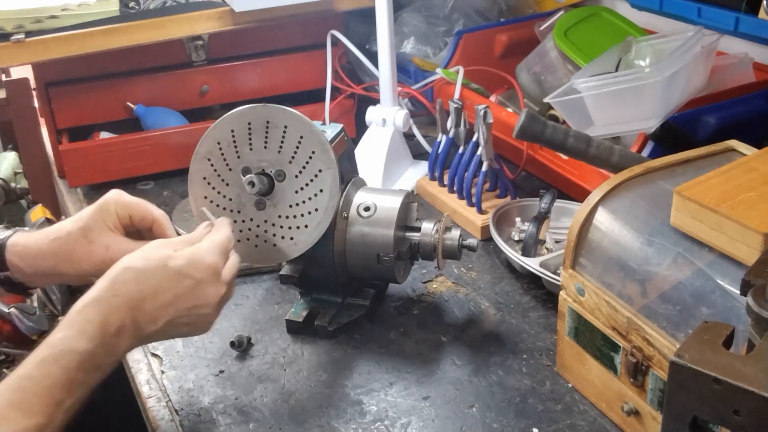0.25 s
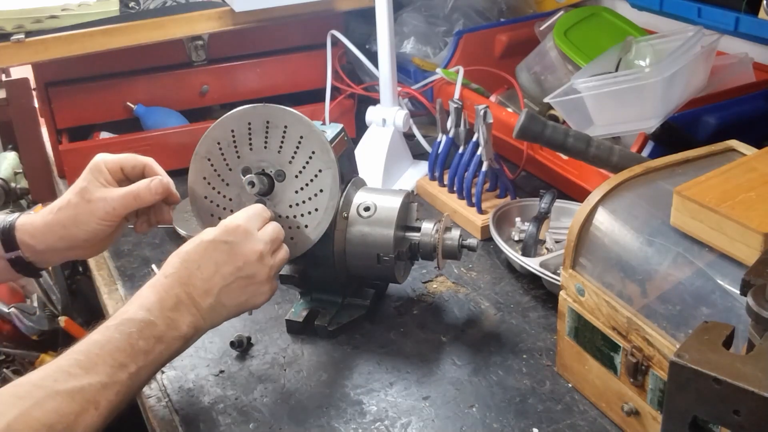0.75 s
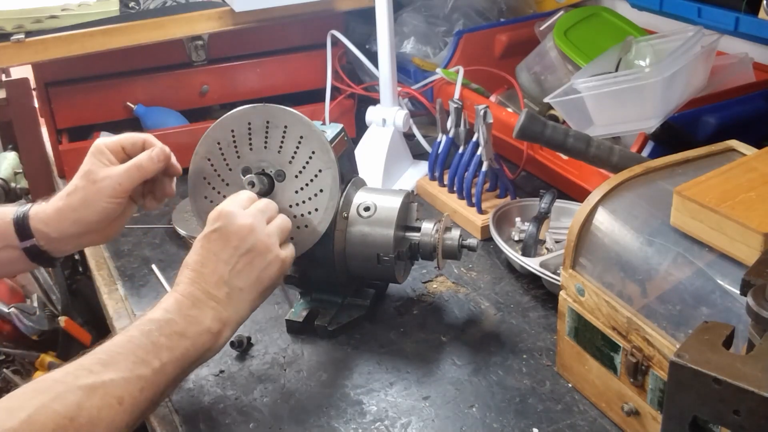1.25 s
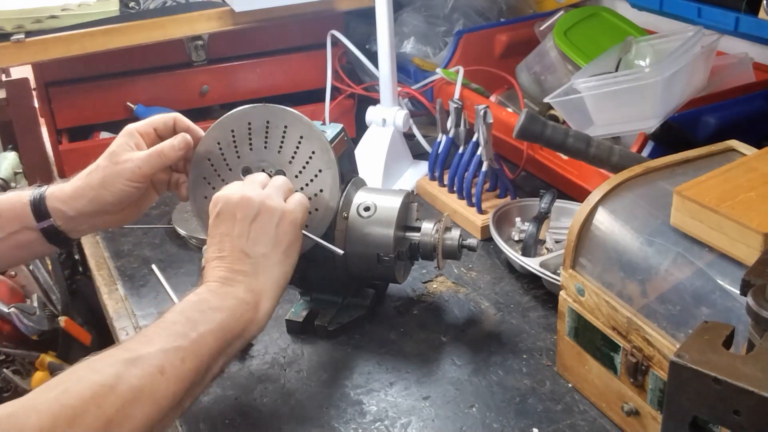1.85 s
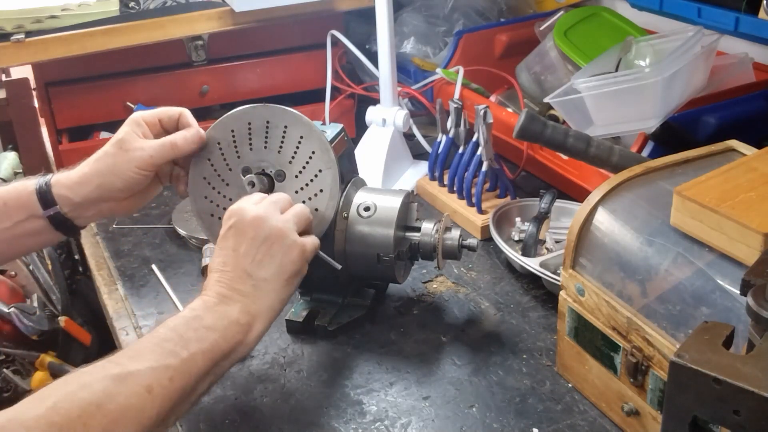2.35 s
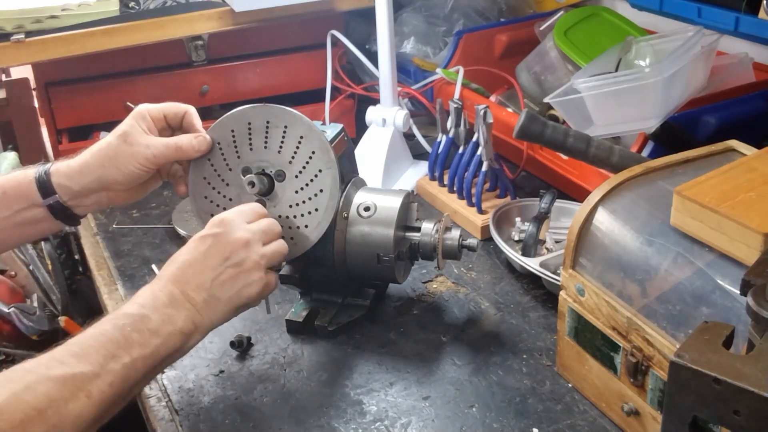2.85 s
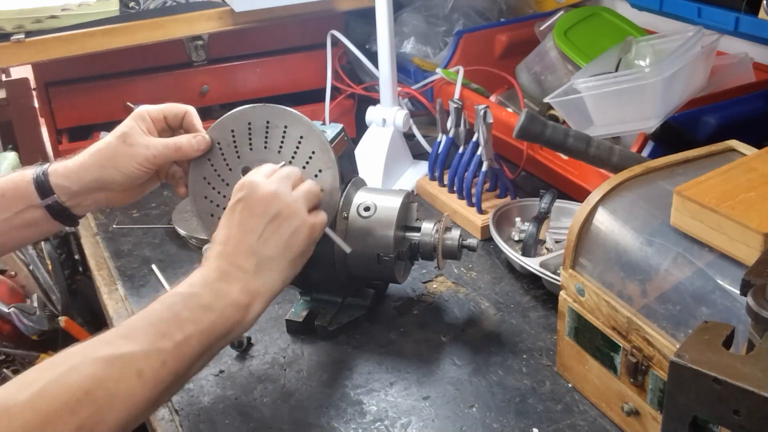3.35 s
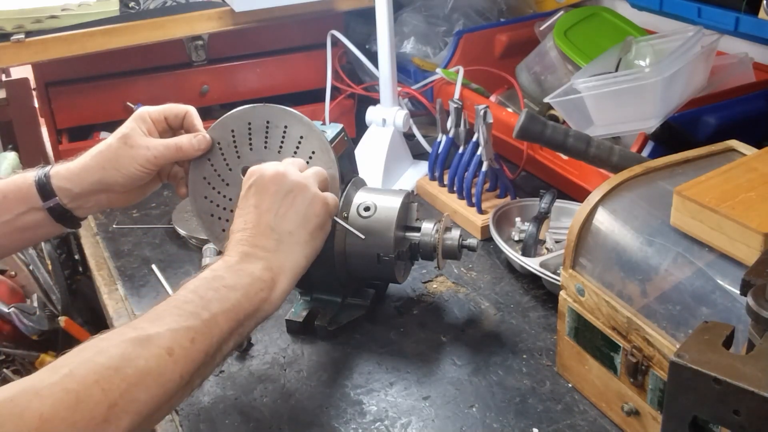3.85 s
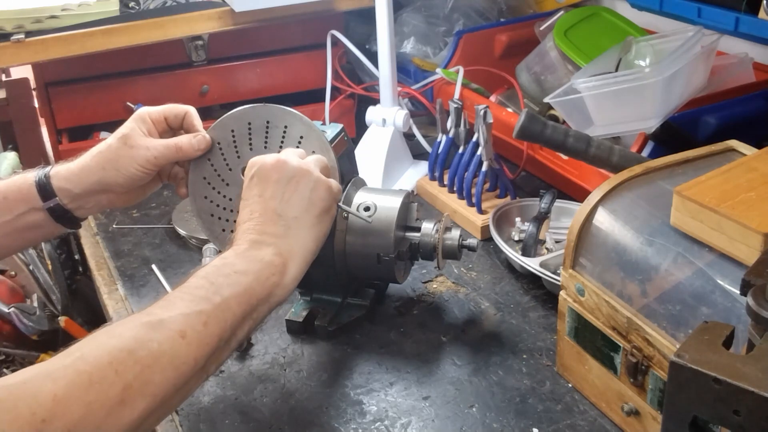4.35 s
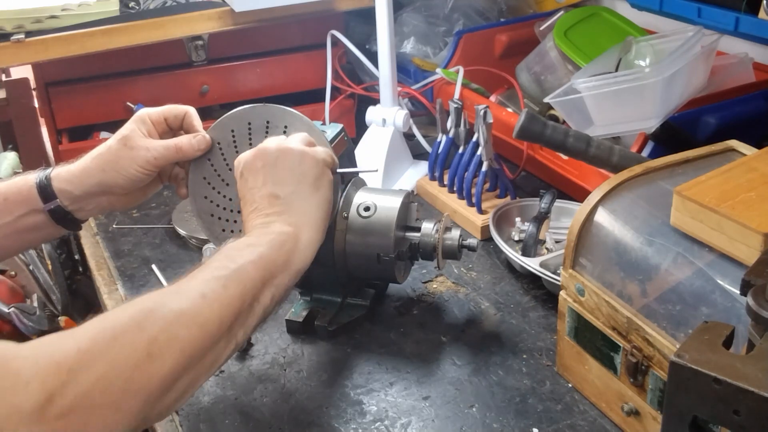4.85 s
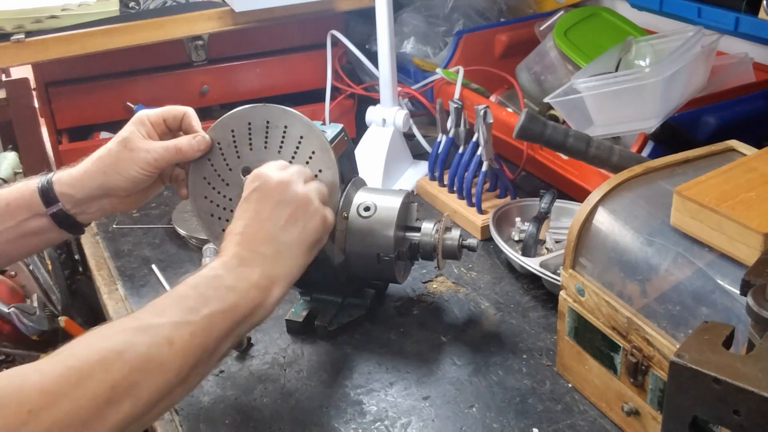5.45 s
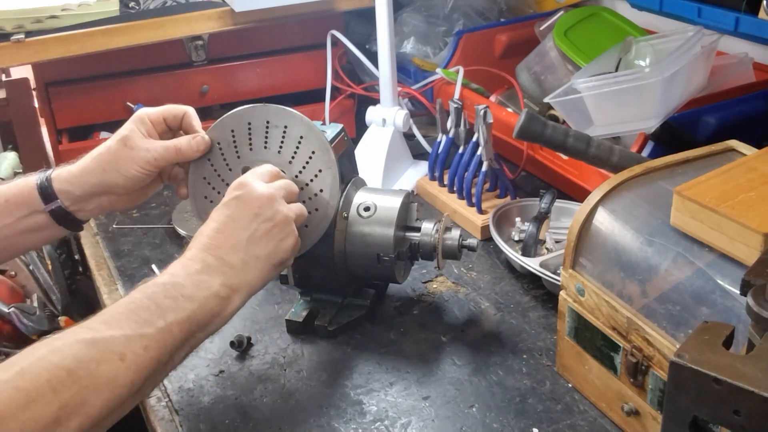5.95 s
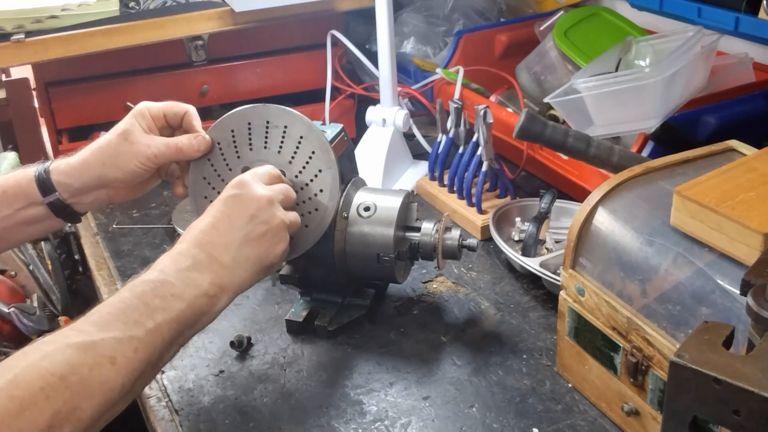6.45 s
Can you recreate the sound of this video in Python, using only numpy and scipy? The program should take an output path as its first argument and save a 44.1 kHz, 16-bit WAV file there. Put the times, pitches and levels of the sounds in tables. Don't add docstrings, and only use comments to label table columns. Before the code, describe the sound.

A small indoor workshop with constant soft air hiss, low building rumble and a barely audible fan hum. From the start a pendulum clock across the room beats about every 0.42 seconds, a stronger, woody-brassy tick alternating with a weaker tock, each a small cluster of contacts blurred by short reverberation. Near the microphone, a screw is touched very lightly at 0.8 s. A faint key tap at 1.9 s leads to a loud, sharp steel clink at 2.1 s, with a barely perceptible scrape at 2.3. Bright, high plate clinks follow at 3.2, 3.75 and 3.9 s, then smaller taps at 4.1 to 4.2 and a quick light rattle around 4.65. Faint screw turns come at 5.25 and 5.6 s. After that only the clock and room tone continue, to about 6.7 s. The close clinks are dry and direct, with hard bench echoes stronger on the right.

```python
import sys
import numpy as np
from scipy import signal
from scipy.fft import rfft, irfft, next_fast_len
from scipy.io import wavfile

SR = 44100
rng = np.random.default_rng(int(sys.argv[2]) if len(sys.argv) > 2 else 0)


def wav_out(sig):
    wavfile.write(sys.argv[1], SR, np.round(np.clip(np.atleast_2d(sig).T, -1, 1) * 32767).astype(np.int16))


def nominal_scale(level):
    x = np.asarray(level, float) / 20
    return 10 ** x


N = 295911
SIZE = next_fast_len(N, real=True)


def rms_one(x):
    return x / np.sqrt(np.mean(x ** 2) + 1e-20)


def at_hz(points, hz):
    table_hz, value = np.array(points)[:, 0], np.array(points)[:, 1]
    return np.interp(np.log(np.maximum(hz, 1)), np.log(table_hz), value)


def resonance(x, hz, width):
    r = np.exp(-np.pi * np.clip(width, 2, 9000) / SR)
    zeros = [(1 - r * r) / 2, 0, (r * r - 1) / 2]
    poles = [1, -2 * r * np.cos(2 * np.pi * hz / SR), r * r]
    return signal.lfilter(zeros, poles, x)


def struck(blow, hz, width):
    ring = resonance(blow, hz, width)
    return ring * np.sqrt(np.pi * abs(width) / SR / np.sum(ring ** 2))


def coloured(white, spectrum):
    size = white.shape[-1]
    hz = np.arange(size // 2 + 1) * SR / size
    return irfft(rfft(white) * nominal_scale(at_hz(spectrum, hz)), size)


def drift(rate):
    knots = rng.standard_normal(400)
    return np.interp(np.arange(N) / SR * rate, np.arange(400), knots)


def add(track, s, sound):
    at = max(round(s * SR), 0)
    track[at:at + len(sound)] += sound[:N - at]


# frequency in Hz, left-right likeness from 0 to 1.
EAR_LIKENESS = [(10, 0.63), (100, 0.045), (600, 0.32), (1500, 0.0095), (16000, 0.019)]


def floor(spectrum, level_db, patchy_db):
    mid, side = rfft(coloured(rng.standard_normal((2, SIZE)), spectrum))
    hz = np.arange(len(mid)) * SR / SIZE
    alike = np.clip(at_hz(EAR_LIKENESS, hz), 0, 1)
    common = np.sqrt(1 + alike) * mid
    opposed = np.sqrt(1 - alike) * side * [[1], [-1]]
    ears = irfft(common + opposed, SIZE)[:, :N]
    return nominal_scale(level_db + patchy_db * drift(22)) * rms_one(ears)


# frequency in Hz, density in dB per Hz.
AIR_HISS = [(530, -58), (900, -1), (1170, -0.5), (1320, -2), (2030, -4.5), (2980, -6.5), (4060, -7),
            (6180, -8.5), (6960, -8.5), (10000, -6.5), (14800, -9), (16000, -12)]
# frequency in Hz, density in dB per Hz.
BUILDING_RUMBLE = [(9, -36), (14, -4), (17.5, 2.5), (22, -2), (30, -9), (43, -13.5), (76, -19), (193, -28),
                   (259, -30.5), (396, -32), (533, -33.5), (816, -35), (900, -40), (1300, -74)]
# frequency in Hz, width in Hz, level in dB.
FAN_MODES = [(593.3, 8.8, -69.5), (815, 6.2, -72)]


def background():
    sway_spectrum = [(1, 1.0), (4, -11.5), (9, -7), (12, -18.5), (30, -84)]   # Hz, dB
    sway = coloured(rng.standard_normal((2, SIZE)), sway_spectrum)[:, :N]
    out = nominal_scale(-44.5) * rms_one(sway + 0.09 * sway[0])
    for hz, width, db in FAN_MODES:
        out += nominal_scale(db) * rms_one(resonance(rng.standard_normal((2, N)), hz, width))
    hiss = floor(AIR_HISS, level_db=-60.5, patchy_db=0.35)
    rumble = floor(BUILDING_RUMBLE, level_db=-45, patchy_db=0.58)
    return out + hiss + rumble


# frequency in Hz, time to fall 60 dB in seconds.
REVERB_TIME = [(300, 0.46), (1000, 0.22), (3000, 0.2), (8000, 0.17), (15000, 0.18)]


def room(rise_s):
    ring = 16384
    t, out = np.arange(ring) / SR, 0
    edges = np.geomspace(150, 19000, 12)
    for low, high in zip(edges, edges[1:]):
        band_filter = signal.butter(2, [low, high], "band", fs=SR, output="sos")
        band = signal.sosfilt(band_filter, rng.standard_normal((2, ring)))
        out = out + band * nominal_scale(-60 * t / at_hz(REVERB_TIME, np.sqrt(low * high)))
    out = out * (1 - np.exp(-t / rise_s)) ** 2
    return out / np.sqrt(np.sum(out ** 2, axis=1, keepdims=True))


def reverberant(source, rise_s):
    return signal.fftconvolve(source[None], room(rise_s), axes=1)[:, :N]


# frequency in Hz, width in Hz, dB on a tick, dB on a tock.
CASE_MODES = [(290, 160, -5, -10.5), (578, 106, -1.1, -3.5), (1300, 140, -14, -34), (1460, 150, -4.5, -3),
              (2378, 55, 4.5, -1), (2417, 43, 0.3, -0.5), (2844, 62, 4.5, 6), (3068, 80, 5.5, 1.5),
              (4444, 130, -2, -8), (4970, 530, -14, -11)]
# frequency in Hz, width in Hz, dB on a tick, dB on a tock.
MOVEMENT_MODES = [(8038, 53, 14, 8), (8750, 220, -20, -29), (8840, 170, -4, -19), (10200, 150, -17, -2),
                  (11130, 120, -17, 3.5), (11800, 320, -13, 3.7), (12630, 190, 1.5, 4.5),
                  (13900, 190, 0.1, -3), (13700, 290, -12, -13), (14700, 250, -22, -22)]


def escapement(beats, side, rattle, contacts, rattle_db, lead_s):
    size = 8192
    contact_s = 0.00066
    scatter_s, scatter_db = 0.0012, 1.1
    out, t = np.zeros(N), np.arange(size) / SR
    for s, peak_db in beats:
        clicks = np.zeros(size) + 1e-18
        for delay, db in contacts:
            since = t - abs(delay + (delay > 0) * rng.normal(0, scatter_s))
            chatter = (since >= 0) * np.exp(-abs(since) / contact_s)
            clicks += nominal_scale(db) * rng.standard_normal(size) * chatter
        swell = (1 - np.exp(-t / 0.0082)) ** 2 * np.exp(-t / 0.0078)
        burst = coloured(rng.standard_normal(size), rattle) * swell
        beat = nominal_scale(rattle_db) * rms_one(burst) / np.sqrt(size)
        for hz, width, *drive_db in CASE_MODES + MOVEMENT_MODES:
            mode_db = drive_db[side == "tock"] + 30 + rng.normal(0, scatter_db)
            beat += nominal_scale(mode_db) * struck(clicks, hz, width)
        add(out, s - lead_s, nominal_scale(peak_db) * beat)
    return out


# start in seconds, peak level in dB.
TICK_BEATS = [
    (0.0158, -33.5),
    (0.861, -33),
    (1.698, -34.5),
    (2.532, -34),
    (3.3605, -34),
    (4.1909, -34.5),
    (5.033, -35.5),
    (5.8657, -34),
    (6.7002, -33),
]
# start in seconds, peak level in dB.
TOCK_BEATS = [
    (0.4341, -42),
    (1.266, -43),
    (2.1026, -39),
    (2.9329, -40.5),
    (3.7652, -36.5),
    (4.5917, -41),
    (5.4345, -42),
    (6.267, -40.5),
]
# frequency in Hz, density in dB per Hz.
TICK_NOISE = [(180, -11), (300, -16.5), (930, -20.5), (1280, -2), (1800, -38), (2400, -1), (2610, -2.5),
              (3400, -22.5), (5900, -20.5), (8220, -10.5), (9710, -6.5), (14200, -13.5), (15600, -42)]
# frequency in Hz, density in dB per Hz.
TOCK_NOISE = [(180, -18), (300, 1), (930, -16), (1430, -6.5), (2140, -18.5), (2400, -7), (2790, -0.5),
              (3580, -15.5), (7200, -11.5), (7950, 0), (9550, -12), (13800, -10), (15600, -42)]
# delay in seconds, level in dB.
TICK_STEPS = [
    (0, -7.5),
    (.004, 0),
    (.012, -4.5),
    (.022, -17),
    (.036, -29),
]
# delay in seconds, level in dB.
TOCK_STEPS = [
    (0, -6),
    (.004, 0.5),
    (0.014, -12),
    (0.026, -3),
    (.036, -26),
]


def clock():
    beats = escapement(TICK_BEATS, "tick", TICK_NOISE, TICK_STEPS, rattle_db=17.0, lead_s=0.004)
    beats += escapement(TOCK_BEATS, "tock", TOCK_NOISE, TOCK_STEPS, rattle_db=23.0, lead_s=0.005)
    far = reverberant(beats, rise_s=0.0013) * nominal_scale(1.2)
    direct = np.array([np.roll(beats, shift=13), beats])
    return far + direct * nominal_scale([[-4.5], [-3]])


# delay in seconds, level in dB.
EARLY_ECHOES = [
    [(.0041, -22), (.0078, -25), (.0115, -30)],
    [(.0044, -3.5), (.0071, -14), (.0123, -11)],
]


def bench(work):
    out = work * nominal_scale([[-0.4], [0.4]])
    for ear, echoes in enumerate(EARLY_ECHOES):
        for s, db in echoes:
            out[ear] += nominal_scale(db) * np.roll(work, round(s * SR))
    return out


def steel(events, body):
    size = 2048
    out, t = np.zeros(N), np.arange(size) / SR
    for s, peak_db, chatter_s, bright_db, ring_db in events:
        uneven = nominal_scale(3.3 * rng.standard_normal(size))
        grains = rng.standard_normal(size) * uneven * np.exp(-t / max(chatter_s, 1e-4))
        blow = 0
        for k, (hz, width, db) in enumerate(body):
            part_db = bright_db * np.log2(hz / 9000) + ring_db * (8700 < hz < 9900)
            gain = nominal_scale(db + part_db + rng.normal(0, 0.24))
            blow = blow + (-1) ** k * gain * struck(grains + 1e-18, hz, width)
        add(out, s, nominal_scale(peak_db + 17.0) * blow)
    return out


# start in seconds, peak in dB, chatter length in seconds,
# brightness in dB per octave, strength of the 9 kHz ring in dB.
PLATE_CLINKS = [(1.903, -49, .001, 1.9, -1), (3.131, -42, .03, -12, 1), (3.1815, -42, 0.002, -11, 9),
                (3.1848, -15, 0.0006, -3.5, 6), (3.7516, -14, .0004, -1, 5), (3.8865, -23, 0.0023, -5, 0),
                (3.8902, -13.5, 0.0008, -6.5, 1), (4.0595, -27.5, 0.0017, -10.5, 6),
                (4.087, -32, 0.0024, -10, 3), (4.1802, -24.5, 0.00018, -6, 5.5),
                (4.522, -44, 0.029, -13, 3), (4.6285, -27, 0.0012, -2.5, -3),
                (4.6365, -23, 0.0014, -7.5, 2), (4.643, -29, 0.00091, 2, -4),
                (4.6645, -31.5, 0.0007, -13, 3)]
# the same five columns, in s, dB, s, dB per octave and dB.
BOSS_CLINK = [
    (2.1398, -8.5, 0.0004, 0.94, 0.1),
]
# the same five columns, in s, dB, s, dB per octave and dB.
SCREW_TOUCHES = [
    (.789, -37.5, 0.0053, -6, -9),
    (.798, -40, 0.003, -4, -9),
    (2.3, -59, 0.012, -14, -9),
    (5.25, -44.5, .005, 13, -9),
    (5.636, -41.5, 0.0081, -7, -3),
]
# frequency in Hz, width in Hz, level in dB.
PLATE_MODES = [(2800, 350, -25), (3700, 530, -25.5), (4620, 490, -19.5), (5270, 260, -13), (7600, 920, -9),
               (7900, 350, -1.5), (8720, 280, -3), (8940, 120, -2), (9160, 190, 6), (9660, 270, 0),
               (10600, 990, -10.5), (11300, 330, -7.5), (13800, 690, -3.5), (14400, 1300, -28)]
# frequency in Hz, width in Hz, level in dB.
BOSS_MODES = [(1530, 140, -10.5), (2780, 350, -24), (3400, 820, -12), (5500, 950, -16.5), (6820, 255, 0.5),
              (7980, 380, 4.5), (8400, 660, -0.5), (10130, 620, -2), (11600, 930, -5.5), (14000, 1100, -13),
              (15200, 950, -13)]
# frequency in Hz, width in Hz, level in dB.
SCREW_MODES = [(2370, 730, -9.5), (3580, 1000, -13.5), (4850, 700, -4), (8400, 1200, -1), (9700, 910, 9),
               (12000, 3000, -11)]


def key_and_screw():
    work = steel(PLATE_CLINKS, PLATE_MODES)
    work += steel(BOSS_CLINK, BOSS_MODES)
    work += steel(SCREW_TOUCHES, SCREW_MODES)
    return reverberant(work, rise_s=0.00067) * nominal_scale(1.5) + bench(work)


def scene():
    return background() + clock() + key_and_screw()


def top_cut(x):
    return signal.sosfilt(signal.butter(12, 15930, fs=SR, output="sos"), x)


def record(dry):
    low_pass = signal.ellip(10, 0.5, 60, 15930, fs=SR, output="sos")
    mix = signal.sosfilt(low_pass, dry) - 0.0005
    return top_cut(mix)


dry = scene()
out = record(dry)
wav_out(out)
```